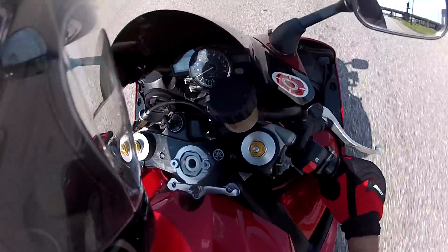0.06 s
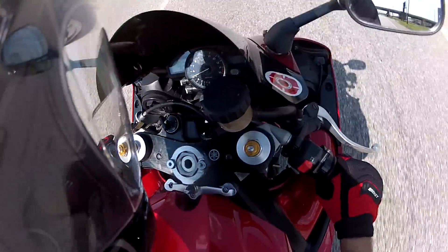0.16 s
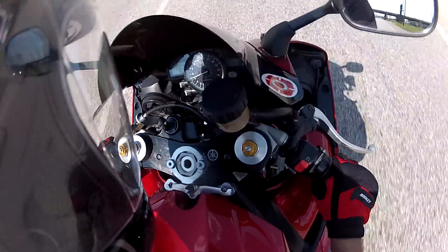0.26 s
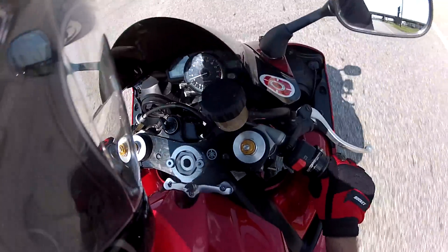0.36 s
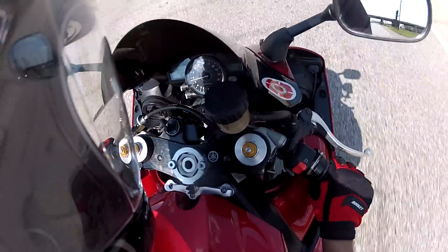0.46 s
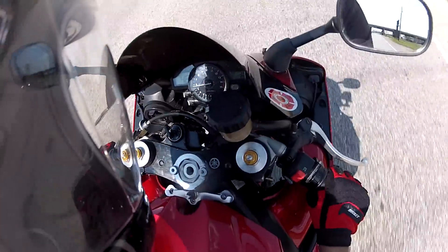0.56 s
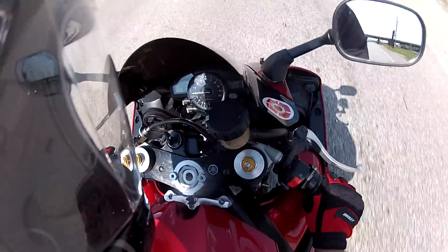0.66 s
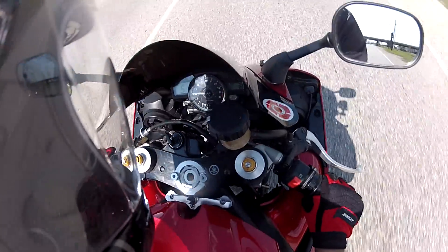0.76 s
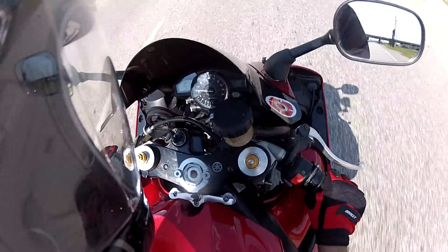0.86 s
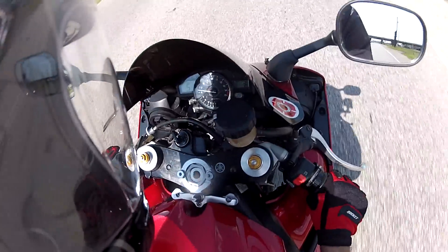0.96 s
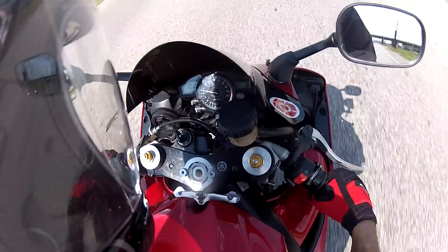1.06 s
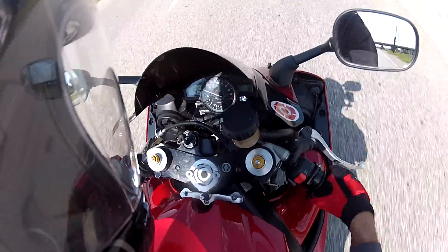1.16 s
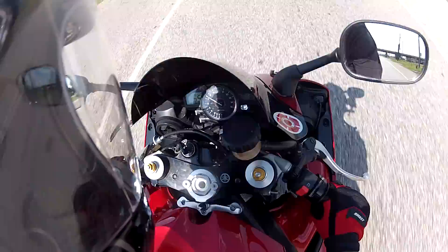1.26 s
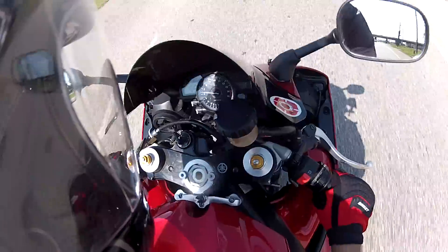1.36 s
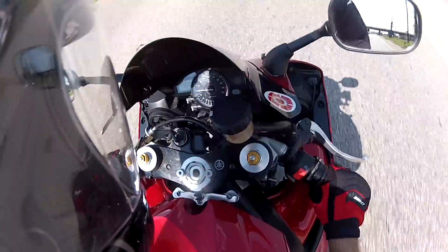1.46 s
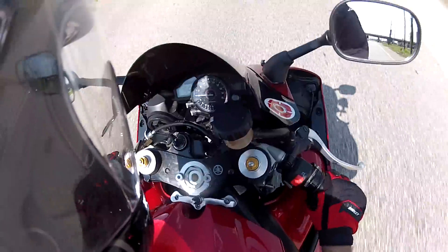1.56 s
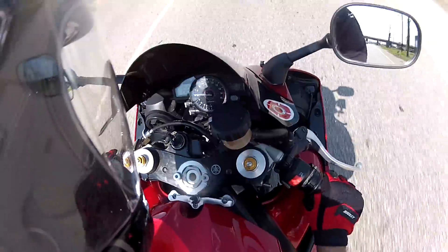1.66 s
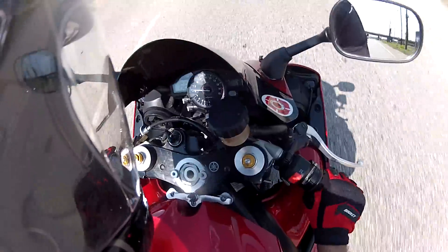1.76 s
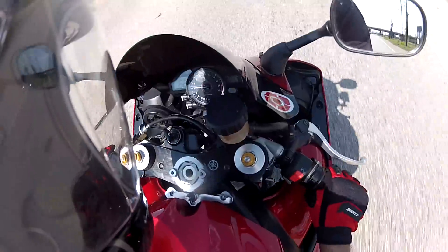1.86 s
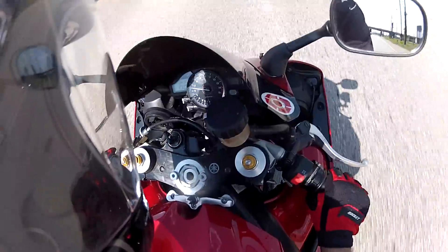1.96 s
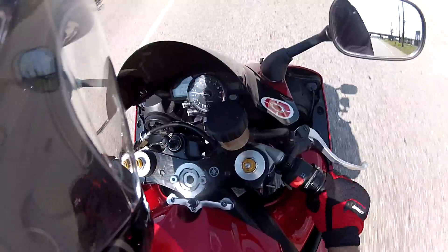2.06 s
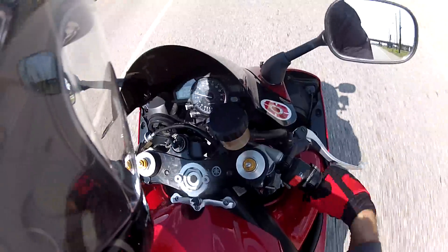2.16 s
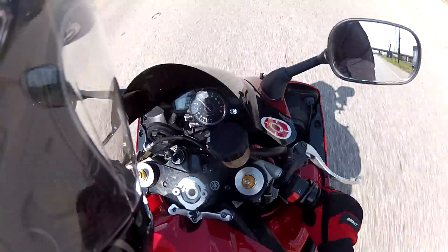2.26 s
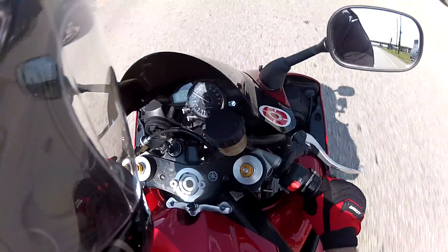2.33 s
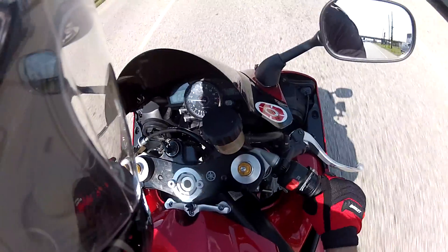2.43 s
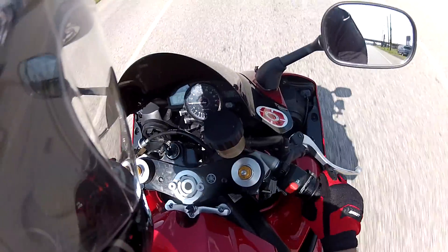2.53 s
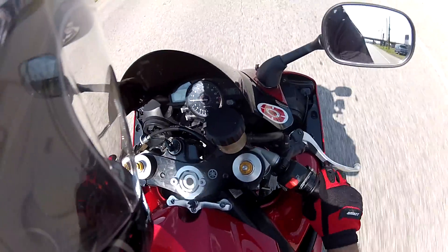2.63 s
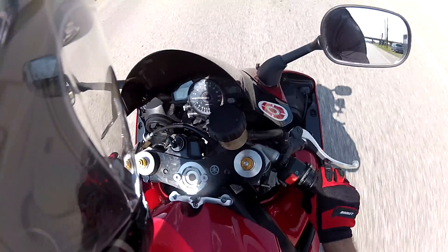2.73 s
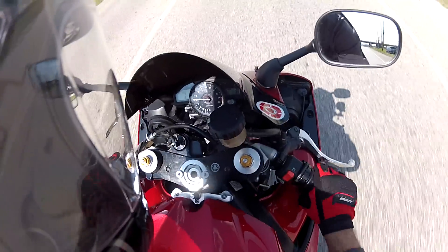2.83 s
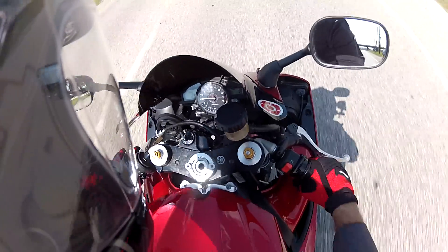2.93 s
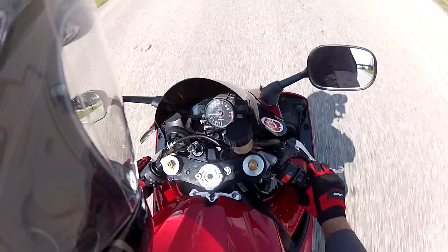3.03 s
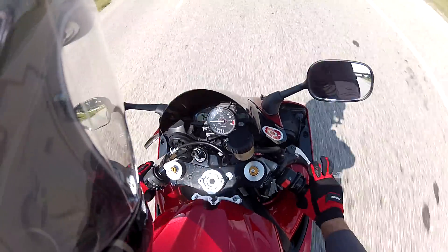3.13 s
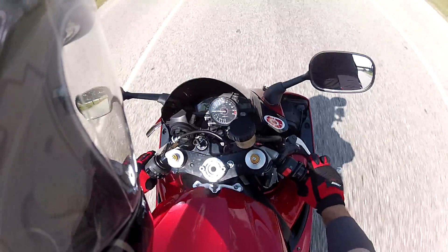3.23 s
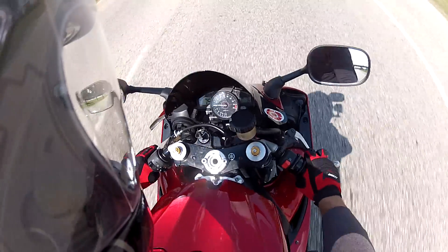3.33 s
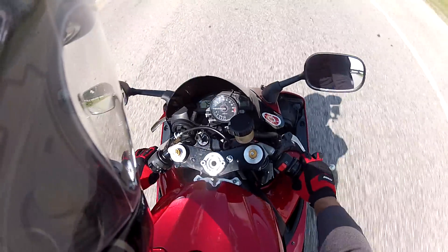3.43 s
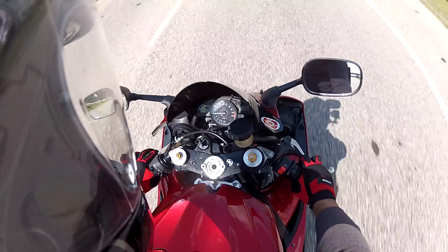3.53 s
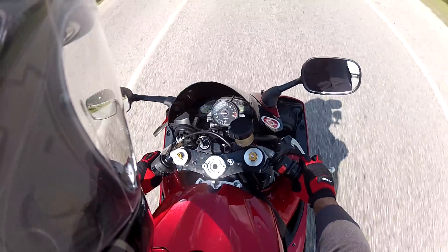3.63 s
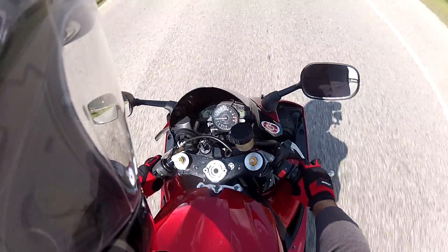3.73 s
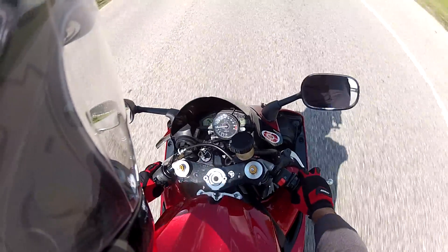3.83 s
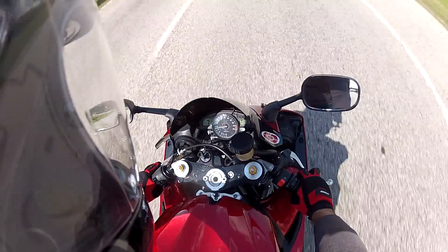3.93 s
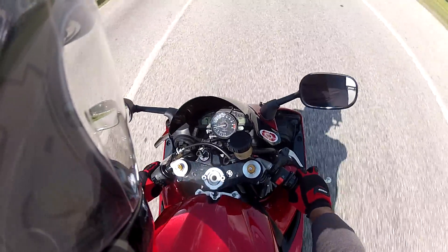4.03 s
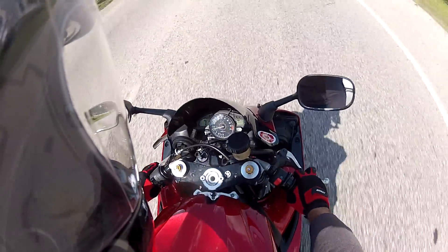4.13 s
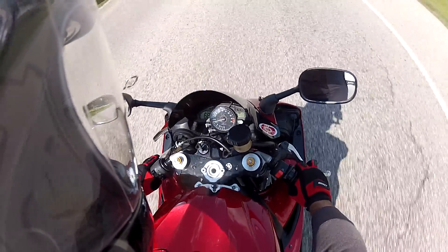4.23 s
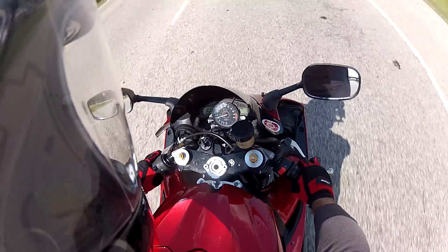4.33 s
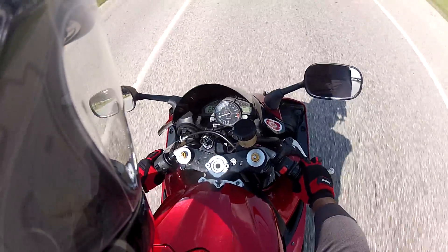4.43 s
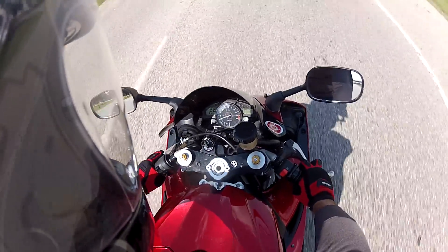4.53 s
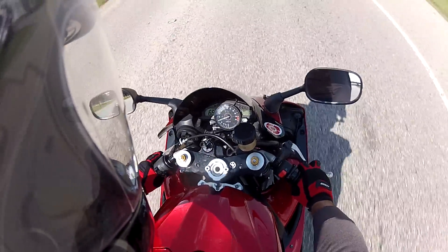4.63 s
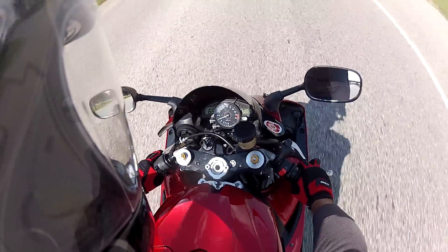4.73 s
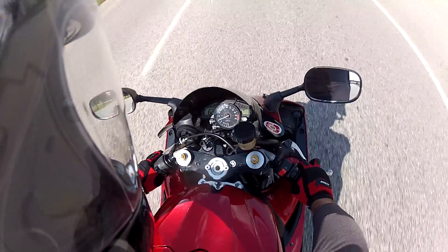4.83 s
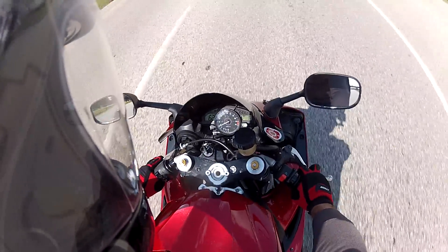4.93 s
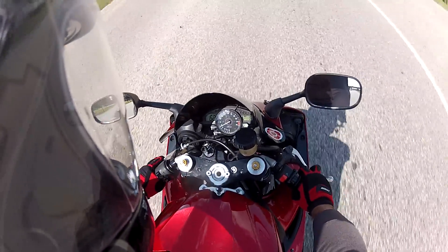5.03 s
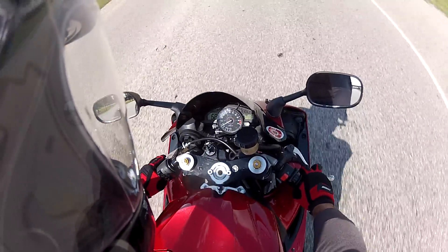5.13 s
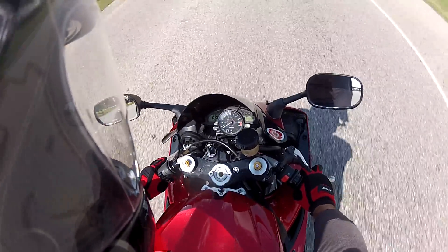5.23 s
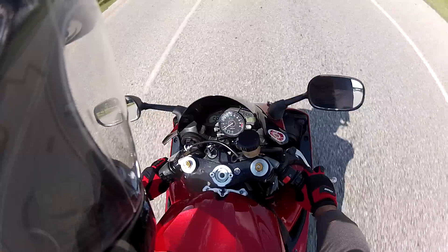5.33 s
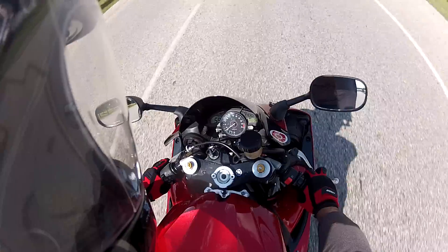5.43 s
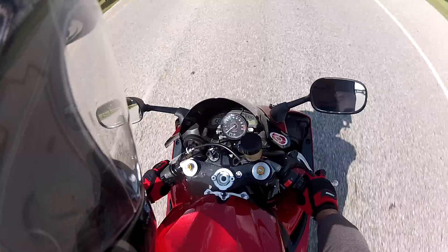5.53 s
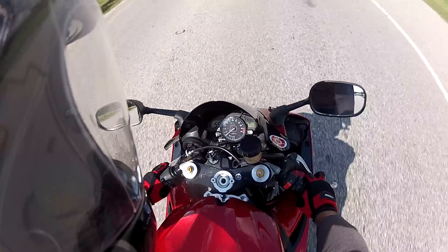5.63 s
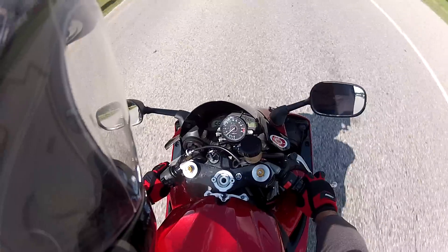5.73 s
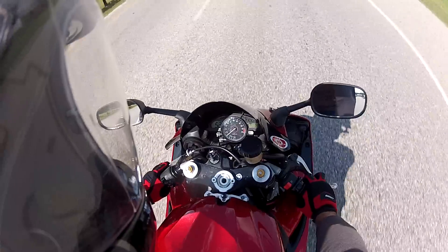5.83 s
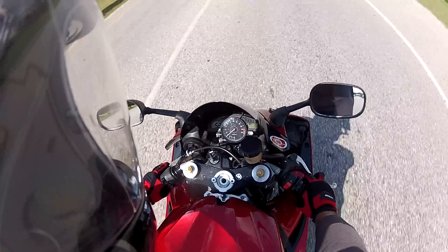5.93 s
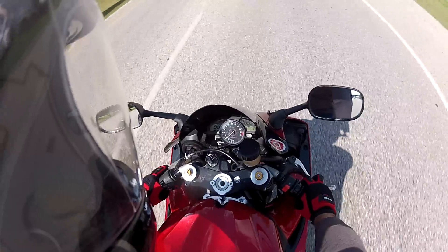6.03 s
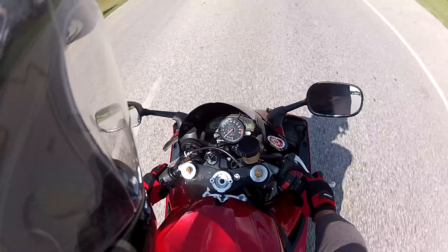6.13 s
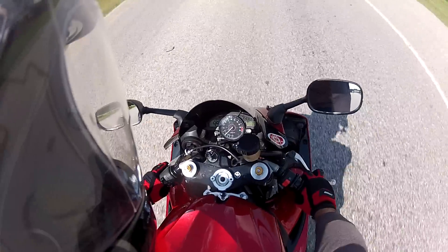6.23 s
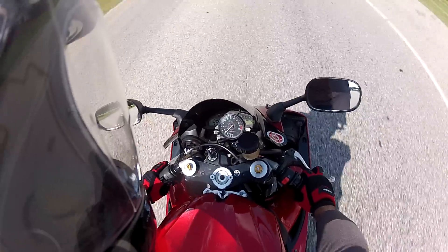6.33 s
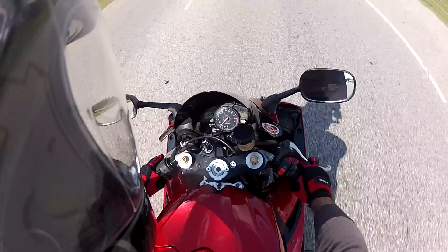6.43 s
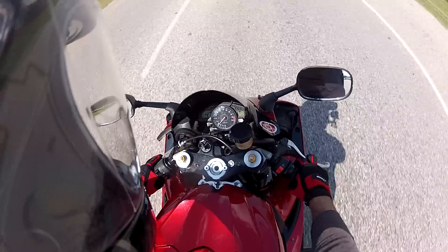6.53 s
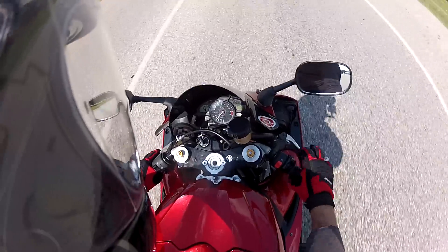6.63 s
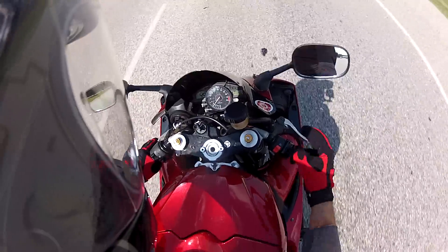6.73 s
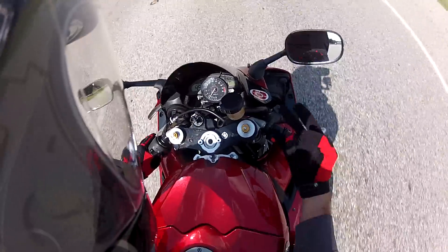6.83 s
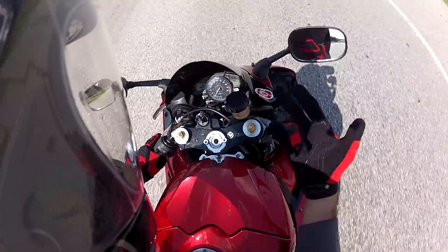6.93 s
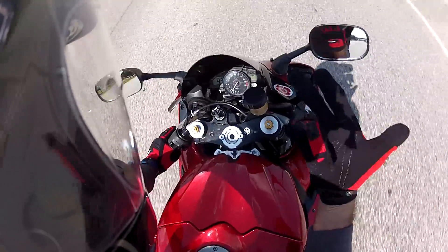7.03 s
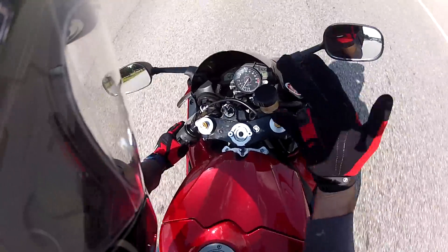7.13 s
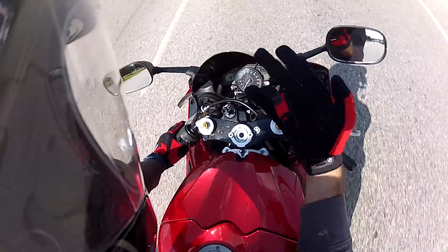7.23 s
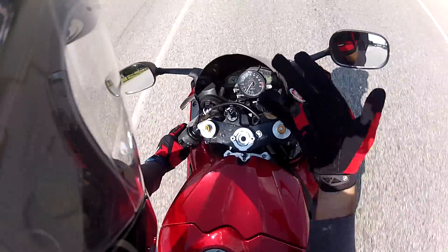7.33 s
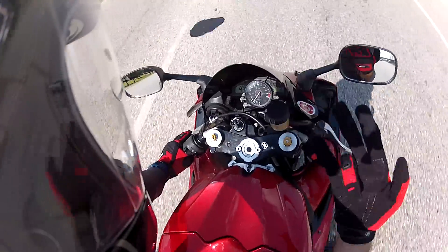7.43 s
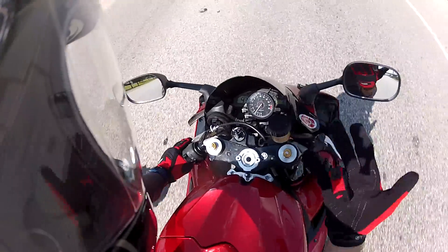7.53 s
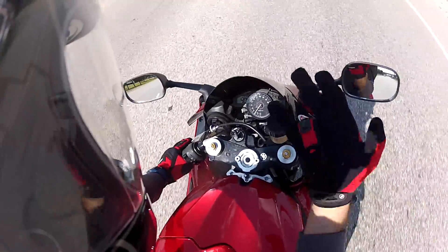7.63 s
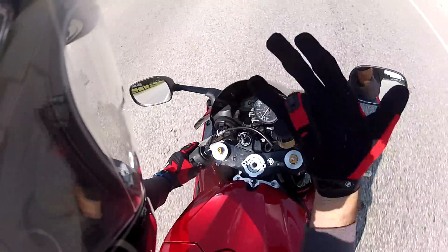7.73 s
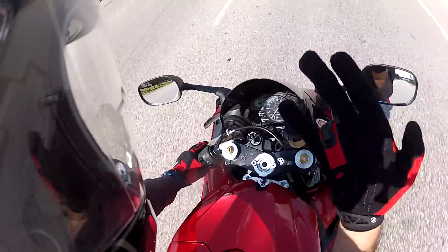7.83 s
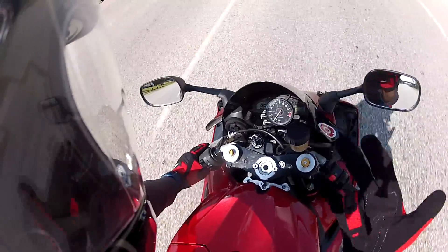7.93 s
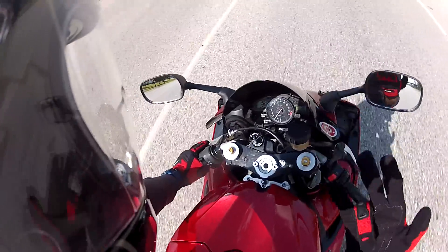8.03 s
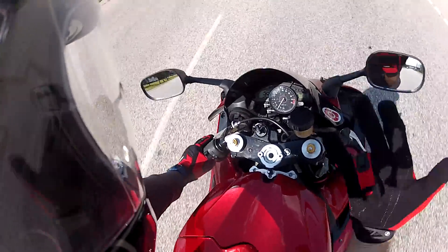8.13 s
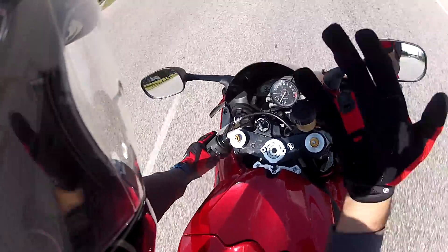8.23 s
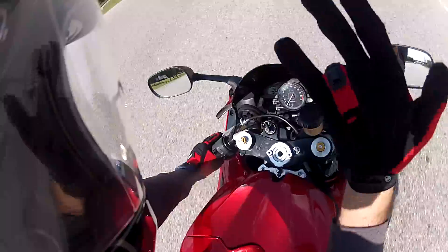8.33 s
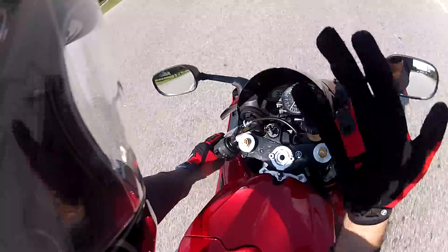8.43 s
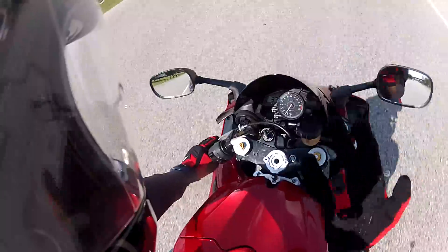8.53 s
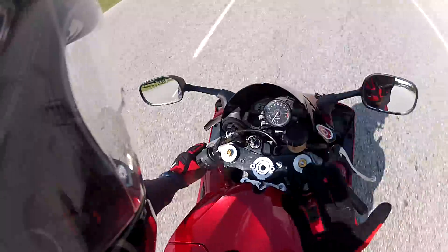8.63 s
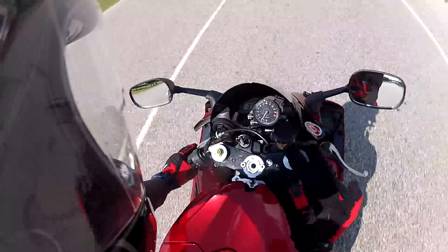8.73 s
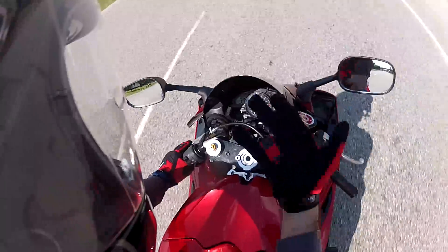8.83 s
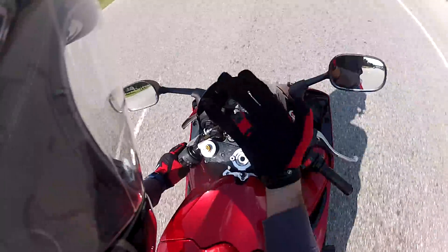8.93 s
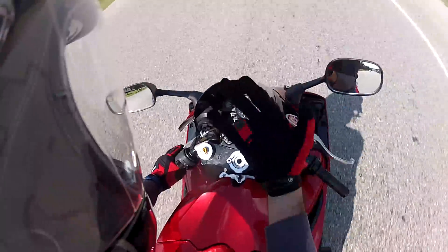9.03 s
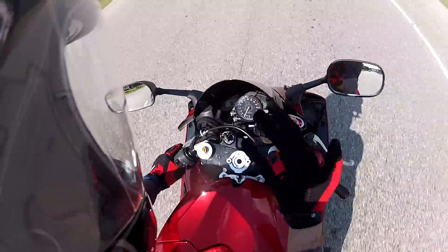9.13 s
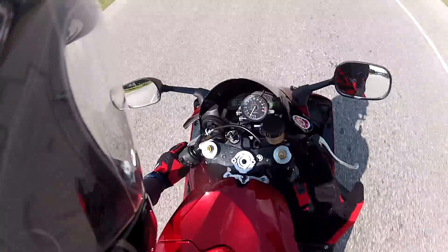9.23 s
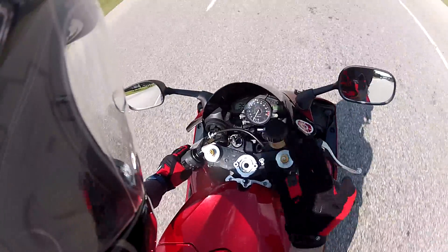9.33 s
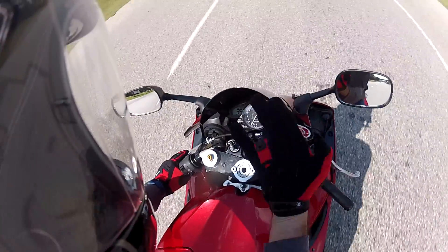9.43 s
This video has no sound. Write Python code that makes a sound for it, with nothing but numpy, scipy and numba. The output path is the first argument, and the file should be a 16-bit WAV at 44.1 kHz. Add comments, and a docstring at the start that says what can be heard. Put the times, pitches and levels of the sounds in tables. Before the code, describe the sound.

A four-cylinder sports motorcycle with a loud, booming exhaust accelerates on an open road, heard from the rider's helmet. It pulls through three gears, the revs flaring at the two quick shifts and a sharp pop ending each pull. Then the throttle shuts and the engine sinks steadily to a quiet low note. Wind rushes, thumps and faintly whistles over the microphone, fading as the bike slows.

```python
"""On the road, heard from a rider's helmet: a four-cylinder sports bike with an open exhaust pulls
through three gears, then coasts down with the throttle shut. Each firing booms in the pipe, and as
each pull ends, unburnt fuel goes off with a pop that makes a limiter turn the sound down briefly.
A thin whine joins the first pull. Air rushes over the microphone's case, thumps it and whistles
over an edge, and this wind fades as the bike slows."""
import sys
import numpy as np
from scipy import signal
from scipy.fft import rfft, irfft, next_fast_len
from scipy.io import wavfile
from scipy.ndimage import minimum_filter1d, map_coordinates
from numba import njit

SR = 44100
rng = np.random.default_rng(int(sys.argv[2]) if len(sys.argv) > 2 else 0)


def inscribe(sig):
    """Save sig as 16-bit PCM at rate SR to the path in sys.argv[1].

    A 1-D sig is mono; a 2-D sig holds one channel per row.
    Samples are clipped to [-1, 1] before scaling.
    """
    pcm = np.round(np.clip(np.atleast_2d(sig).T, -1, 1) * 32767)
    wavfile.write(sys.argv[1], SR, pcm.astype(np.int16))


N = 417627
TIME = np.arange(N) / SR
FREQS = np.arange(N // 2 + 1) * SR / N + 1e-3  # every frequency of a spectrum, in Hz

# how the pipe and silencer boost or weaken each pitch (frequency [Hz], gain [dB])
PIPE_TONE = [(45, -20), (102, 5.5), (160, 0.5), (215, 15.5), (260, 8), (320, -2.5), (385, 4.5), (470, -1.5),
             (600, -2), (800, -11.5), (1030, -7.5), (1500, -23.5), (1780, -19), (1915, -12.5), (2050, -24),
             (2400, -22)]
# bangs of unburnt fuel (time [s], level [dB], ring pitch [Hz])
FUEL_POPS = [(1.1178, 7.3, 900), (2.3208, 5.8, 780), (3.1737, 8.3, 950)]
# one pull per gear (start [s], end [s], first firing rate [Hz], last [Hz], load [dB], throttle [0-1])
GEAR_PULLS = [(0, 1.155, 159.5, 219.1, 8, 0.92), (1.342, 2.185, 188.9, 218, 7, 0.78),
              (2.36, 2.945, 188.6, 203.7, 1.2, 1)]
# gear changes with the clutch in (jump in firing rate [Hz], extra boom [dB])
GEAR_CHANGES = [(50, 3.5), (79, -2)]
# rolling with the throttle shut (time [s], firing rate [Hz], level of the pipe's other tones [dB])
COASTING = [(3.05, 197.3, -43), (3.18, 200, -42), (3.36, 197, -30), (4.0, 176.8, -27.5), (4.72, 159.3, -32),
            (5.31, 142, -36), (5.9, 128, -40), (6.49, 117.2, -37), (7.08, 109.3, -38.5), (8.26, 97.64, -41),
            (9.47, 90.8, -45)]


def exhaust(boom_db, pipe_db, throttle, cycle):
    """Four firings per cycle ring the pipe; unequal cylinders add weaker tones between their harmonics."""
    # ringing of the header pipes that leave the cylinders (pitch [Hz], width [Hz], gain [dB])
    header_rings = [(538, 24, 0), (770, 29, -3.5)]
    # from the second pop on, with the throttle shut, the note flutters more
    shut_after_second_pop = (1 - throttle) * (TIME > FUEL_POPS[1][0])
    flutter_db = (.19 + .72 * shut_after_second_pop) * walk(26)
    boom = undb(boom_db + flutter_db) * np.sin(4 * cycle)
    jitter = .02 * walk(45)
    brightness = .06 + .94 * throttle
    tones = np.zeros(N)
    for order in [2, *range(6, 50, 2), *range(9, 19, 2)]:  # swings per engine cycle
        hz = order * FIRING_HZ / 4
        if order % 2:
            gain = sum(undb(db) / (1 + ((hz - pitch) / width) ** 2) for pitch, width, db in header_rings)
        else:
            # tones between the firing harmonics are weak low down and catch up in the treble
            gain = response(PIPE_TONE, hz) * undb(-10 * (order % 4 > 0) * np.exp(-order / 25))
        # soft coasting pulses only ring the lowest notes of the pipe
        gain *= brightness + (1 - brightness) / (1 + (hz / 310) ** 10)
        waver = 1 + min(.012 * order, .35) * walk(40)
        # even orders line up into a throb; the long ring of the headers smears the odd ones
        smear = order ** 2 * (1 if order % 2 else .045)
        tones += gain * waver * np.sin(order * (cycle + jitter) - smear)
    return np.sqrt(2) * (boom + undb(pipe_db) * tones)


def firing_rate():
    """Firings per second: they climb in each gear, jump while the clutch is in and sink on the coast."""
    points = []
    for start, end, first_hz, last_hz, *_ in GEAR_PULLS:
        points += [(start, first_hz), (end, last_hz)]
    hz, = curves(points + [row[:2] for row in COASTING])
    jumps_hz, _ = np.transpose(GEAR_CHANGES)
    return hz + jumps_hz @ rev_flares()


def rev_flares():
    """The revs flare at each gear change: an arch, 0-1, that rises faster than it falls."""
    gaps = zip(GEAR_PULLS, GEAR_PULLS[1:])
    progress = np.array([np.interp(TIME, [before[1], after[0]], [0, 1]) for before, after in gaps])
    return np.sin(np.pi * progress ** .821)


def engine_effort():
    """Boom level (dB), level of the other tones (dB) and throttle; revs and load set both levels."""
    # how loudly the pipe booms without load (firing rate [Hz], level [dB])
    boom_levels = [(90, -31), (101, -27.5), (118, -31.5), (129, -38), (142, -30.5), (160, -29.5),
                   (176, -23), (190, -18.5), (218, -14.5), (245, -12), (280, -18.5)]
    open_s, shut_s, gear_change_db = .04, .094, -24
    pulling = np.array([envelope(start - open_s, open_s, end - start, shut_s)
                        for start, end, *_ in GEAR_PULLS])
    *_, loads_db, throttles = np.transpose(GEAR_PULLS)
    _, extra_boom_db = np.transpose(GEAR_CHANGES)
    driving = pulling.sum(axis=0)
    load_db = loads_db @ pulling
    # the note breaks briefly as the engine swings between driving and coasting
    break_db = -10 * np.sin(np.pi * driving) ** 4
    unloaded_db = 20 * np.log10(response(boom_levels, FIRING_HZ))
    boom_db = unloaded_db + load_db + extra_boom_db @ rev_flares() + break_db
    _, coast_db = curves(COASTING)
    shut_db = np.where(TIME < GEAR_PULLS[-1][0], gear_change_db, coast_db)
    power_db = -29.5 + 13.5 * np.log2(FIRING_HZ / 200)  # 13.5 dB more for twice the revs
    pipe_db = driving * power_db + (1 - driving) * shut_db + load_db
    return boom_db, pipe_db, np.clip(throttles @ pulling, 0, 1)


def exhaust_gas(pipe_db, throttle, cycle, case):
    """Swirling gas burbles in the pipe; with the throttle open, each firing also rasps."""
    burble = noise(response(PIPE_TONE, FREQS) ** 2 * below(320, order=5))
    puffs = (1 + np.cos(4 * cycle)) ** 3 * (1 + .35 * np.cos(2 * cycle))
    rasp_band = below(3100, order=3) * (1 - below(560, order=2))
    rasp = unit(puffs * noise(case * rasp_band))
    return undb(pipe_db) * (undb(-1 - 16 * throttle) * burble + undb(-6) * throttle * rasp)


def fuel_pops(case):
    """Each bang of unburnt fuel briefly rings two notes of the silencer, with a crack of gas on top."""
    rise_s, decay_s = .0001, .0024
    out = np.zeros(N)
    crack = noise(case * below(3100, order=2))
    for time_s, db, ring_hz in FUEL_POPS:
        age = np.maximum(TIME - time_s, 0)
        shape = (1 - np.exp(-age / rise_s)) * np.exp(-age / decay_s)
        phase = 2 * np.pi * ring_hz * age
        rings = .45 * np.sin(.72 * phase) + .5 * np.sin(1.25 * phase)
        out += undb(db) * shape * (.28 * crack - rings)
    return out


def mechanical_whine():
    """A thin, unsteady mechanical tone creeps upward during the first pull."""
    start_s, start_hz, rise_hz_per_s = .0708, 1860, 150
    hz = start_hz + rise_hz_per_s * (TIME - start_s)
    phase = 2 * np.pi * np.cumsum(hz) / SR + .7 * walk(70)
    shape = envelope(start_s, attack_s=.08, hold_s=.7, release_s=.3)
    return np.sqrt(2) * shape * undb(-29.5 + 2 * walk(40)) * np.sin(phase)


def wind(case):
    """Air streams past the helmet and dies down as the bike slows."""
    # strength of the airflow (time [s], level [dB])
    airflow = [(0, -25.5), (.5, -20.5), (1, -19.5), (2.05, -18), (2.6, -19), (4.7, -19), (6.3, -28),
               (7.6, -35.5), (9.47, -36)]
    airflow_db, = curves(airflow)
    speed_db = airflow_db - airflow_db.max()  # 0 at the strongest airflow
    return undb(airflow_db) * air_rush(speed_db, case) + edge_whistle() + buffeting(speed_db)


def air_rush(speed_db, case):
    """Air rushes over the microphone's case in quick gusts, brighter at speed."""
    # overall tone of the rush (frequency [Hz], gain [dB])
    rush_tone = [(150, -16), (300, 4.5), (500, -7), (900, -3), (1600, -10.5), (2300, -6.5), (3500, -9.5),
                 (5000, -20), (6000, -26.5), (7000, -23), (10000, -18), (12000, -41), (14000, -17.5),
                 (15500, -24.5)]
    colour = response(rush_tone, FREQS) * case
    low, middle, high = below(1555, order=6), below(3880, order=6), below(7700, order=8)
    hollow = noise(colour * low * (1 - below(283, order=3)))
    body = noise(colour * np.sqrt(1 - low ** 2) * middle)
    hiss = noise(colour * np.sqrt(1 - middle ** 2) * high)
    fizz = noise(colour * np.sqrt(1 - high ** 2))
    treble = undb(-9 + .21 * speed_db) * hiss + undb(-8.5 + .035 * speed_db) * fizz
    # the finest swirls come in bursts of a millisecond or two
    grain = undb(.89 * walk(420))
    # as the rider lifts a hand, the hollow midrange swells, then cuts off
    swell_db = 6 * envelope(start_s=6.7, attack_s=.35, hold_s=0, release_s=.023)
    hollow *= undb(-1.5 + swell_db + .99 * walk(12))
    gusts = undb(.5 * walk(24))
    return gusts * (hollow + grain * (undb(-1) * body + treble))


def edge_whistle():
    """Air blowing over an edge makes a breathy whistle that sets in, holds and dies away."""
    start_s, attack_s, hold_s, fade_db_per_s = 2.26, .17, .7, 7.5
    age = TIME - start_s
    level_db = -22.5 - fade_db_per_s * np.maximum(age - attack_s - hold_s, 0)
    return np.clip(age / attack_s, 0, 1) * undb(level_db) * narrow_noise(hz=1130, width_hz=65)


def buffeting(speed_db):
    """Swirls of air thump the microphone, harder once the rider sits up from behind the windscreen."""
    # tone of the thumps (frequency [Hz], gain [dB])
    thump_tone = [(15, -14), (28, -10), (44, -5), (62, 1), (85, -3), (130, -8.5), (180, -3), (240, -2.5),
                  (310, -11), (480, -18.5), (900, -50)]
    sit_up_s, sit_up_length_s = 3.03, .25
    upright = np.clip((TIME - sit_up_s) / sit_up_length_s, 0, 1)
    big_gust = envelope(start_s=4.19, attack_s=.14, hold_s=0, release_s=.14)
    force_db = .64 * speed_db - 1.5 * (1 - upright) + 3.5 * big_gust
    thumps = noise(response(thump_tone, FREQS)) * undb(1.2 * walk(13))
    # the helmet's deepest shudder only builds up out in the open air
    shudder = upright * narrow_noise(hz=29, width_hz=5)
    return undb(force_db - 22) * thumps + undb(force_db - 29) * shudder


def microphone_case():
    """The case rings at some frequencies and swallows others: its gain at each one."""
    # peaks and dips of the case (frequency [Hz], width [Hz], gain [dB])
    peaks_and_dips = [(681, 80, 7.5), (1059, 148, 7), (1164, 28, 7), (1454, 190, 5.5), (1910, 360, 8.5),
                      (2314, 376, 6), (2706, 94, -0.5), (3076, 49, 5.5), (3700, 340, 3.5), (4025, 110, -11),
                      (4644, 140, 5), (5990, 180, -16), (7360, 200, 4), (7940, 225, -7.5), (8200, 740, 5),
                      (9890, 500, 4.5), (11000, 340, 11), (13200, 174, 7.1)]
    return undb(sum(db * np.exp(-2 * ((FREQS - hz) / width) ** 2) for hz, width, db in peaks_and_dips))


def undb(db):
    """Turn decibels into a gain to multiply by."""
    return 10 ** (np.asarray(db) / 20)


def unit(x):
    """Scale to an average (rms) level of 1."""
    return x / np.sqrt(np.mean(x ** 2))


def curves(table):
    """Join a table's timed rows with straight lines: one curve for each column after the time."""
    times, *columns = np.transpose(table)
    return [np.interp(TIME, times, column) for column in columns]


def envelope(start_s, attack_s, hold_s, release_s):
    """Rise from 0 to 1, hold and fall back, in straight lines."""
    return np.interp(TIME, start_s + np.cumsum([0, attack_s, hold_s, release_s]), [0, 1, 1, 0])


def response(points, hz):
    """Look up the gain at hz in a table of (frequency [Hz], gain [dB])."""
    points_hz, db = np.transpose(points)
    return undb(np.interp(np.log(hz), np.log(points_hz), db))


def below(hz, order):
    """Gains that keep the frequencies below hz; a higher order cuts more sharply."""
    return 1 / np.sqrt(1 + (FREQS / hz) ** (2 * order))


def noise(gain):
    """Noise of level 1, shaped by a gain for each frequency."""
    size = next_fast_len(N)
    gain = np.interp(np.arange(size // 2 + 1) * SR / size, FREQS, gain)
    return unit(irfft(rfft(rng.standard_normal(size)) * gain, size)[:N])


def narrow_noise(hz, width_hz):
    """Noise gathered around one pitch."""
    return noise(1 / (1 + ((FREQS - hz) / width_hz) ** 2))


def walk(rate):
    """A smooth random wander, roughly 1 in size, through rate random values a second."""
    knots = rng.standard_normal(4096)
    coarse_s = np.arange(0, N + 64, 64) / SR
    return np.interp(TIME, coarse_s, map_coordinates(knots, [coarse_s * rate], order=3, mode="mirror"))


FIRING_HZ = firing_rate()


def scene():
    """Engine and wind as they reach the helmet."""
    boom_db, pipe_db, throttle = engine_effort()
    # the engine's phase: one cycle is four firings, or two turns of the crank, whose speed wavers
    cycle = np.pi / 2 * np.cumsum(FIRING_HZ * (1 + .003 * walk(30.1))) / SR
    case = microphone_case()
    engine = exhaust(boom_db, pipe_db, throttle, cycle) + exhaust_gas(pipe_db, throttle, cycle, case)
    return (engine + mechanical_whine() + fuel_pops(case) + wind(case))[None]


@njit
def hold_peaks(overload, release):
    """Jump up with each overload and let go slowly."""
    out, held = np.empty(len(overload)), 0.
    for i in range(len(overload)):
        held = max(overload[i], held * release)
        out[i] = held
    return out


def record(dry):
    """A limiter turns down after each pop; the electronics add a faint sizzle and cut the top treble."""
    attack_s, hold_s, release_s, max_duck_db = .0018, .035, .075, 7
    sizzle_hz, top_hz = 12000, 15300
    overload_db = np.minimum(20 * np.log10(np.maximum(np.abs(dry[0]), 1)), max_duck_db)
    hold = int(hold_s * SR)
    recent_peak_db = -minimum_filter1d(-overload_db, hold, origin=(hold - 1) // 2)
    held_db = hold_peaks(recent_peak_db, np.exp(-1 / (release_s * SR)))
    # the limiter needs a moment to bite, so the front of a pop clips
    attack = np.exp(-1 / (attack_s * SR))
    duck_db = signal.lfilter([1 - attack], [1, -attack], held_db)
    limited = np.clip(dry * undb(-duck_db), -1, 1)
    sizzle = undb(-27.5) * limited * np.cos(2 * np.pi * sizzle_hz * TIME)
    treble_cut = signal.ellip(10, .2, 80, top_hz, fs=SR, output="sos")
    return signal.sosfilt(treble_cut, limited + sizzle)


dry = scene()
out = record(dry)
inscribe(out)
```